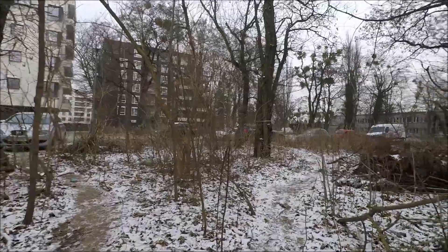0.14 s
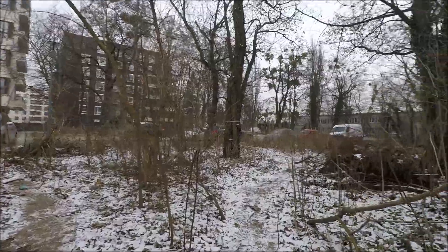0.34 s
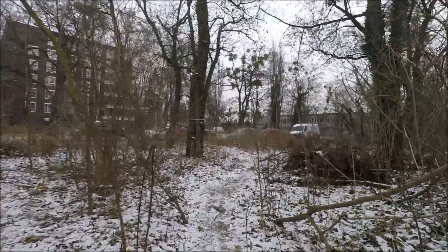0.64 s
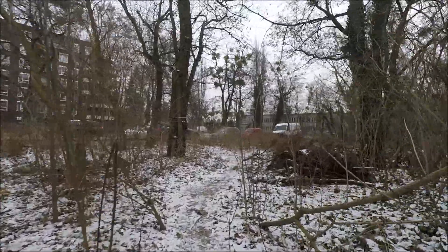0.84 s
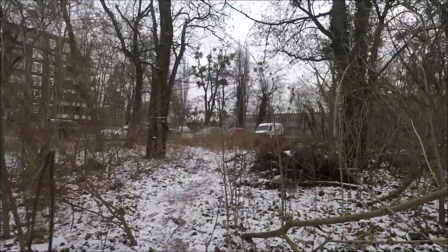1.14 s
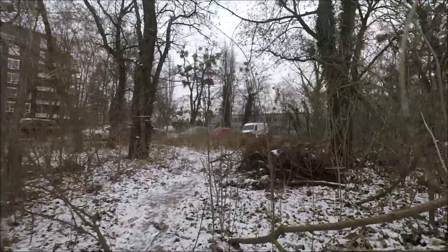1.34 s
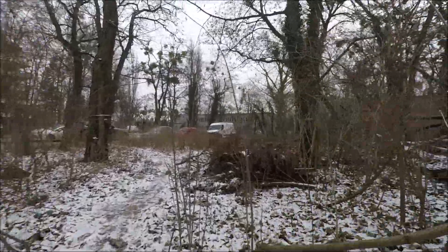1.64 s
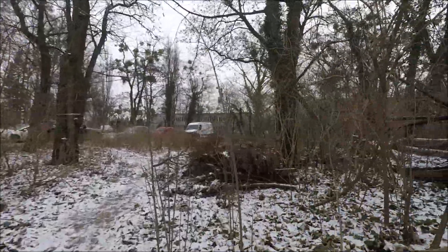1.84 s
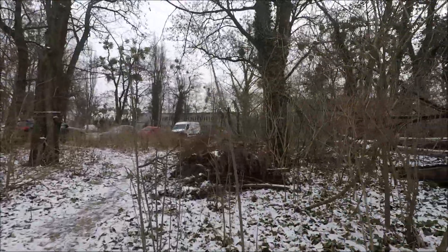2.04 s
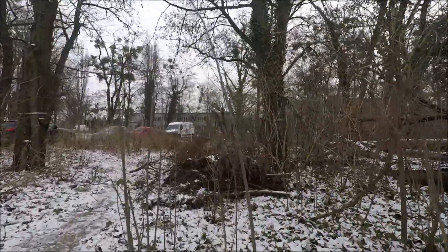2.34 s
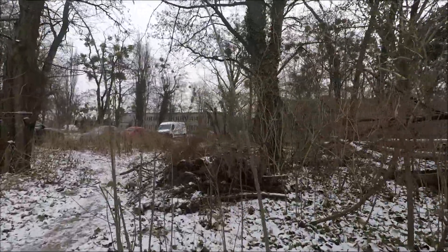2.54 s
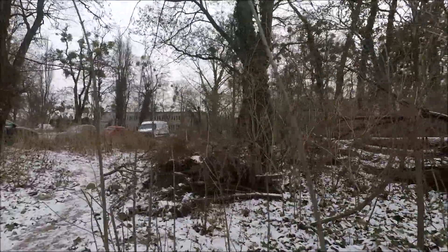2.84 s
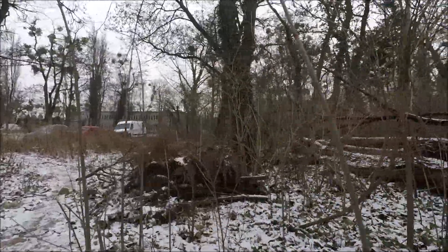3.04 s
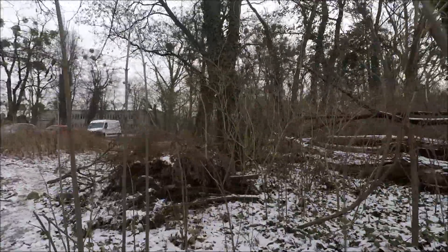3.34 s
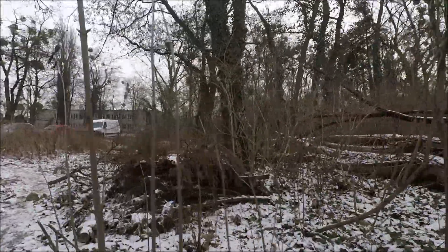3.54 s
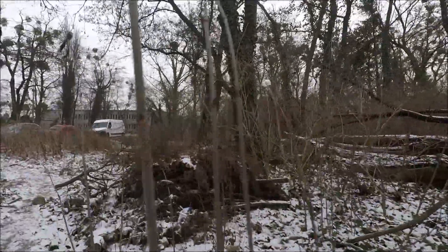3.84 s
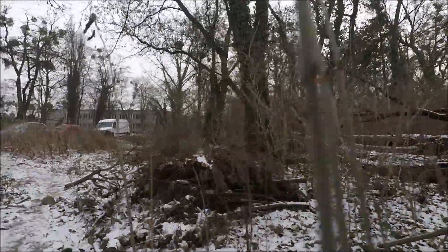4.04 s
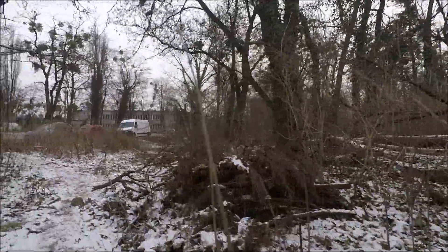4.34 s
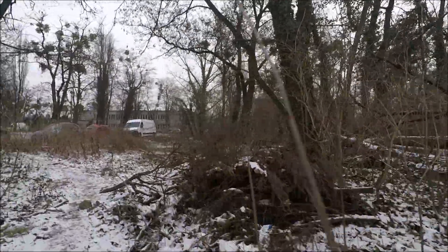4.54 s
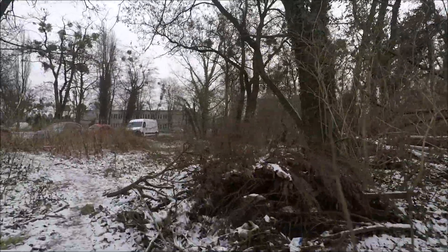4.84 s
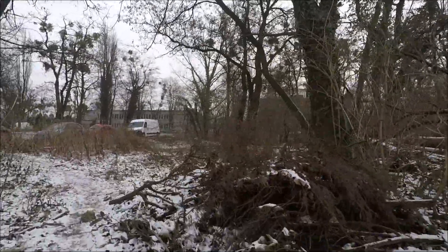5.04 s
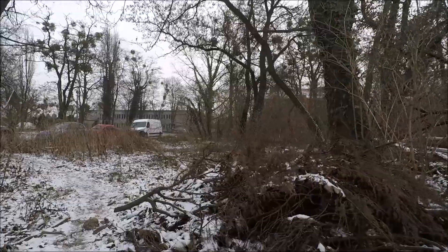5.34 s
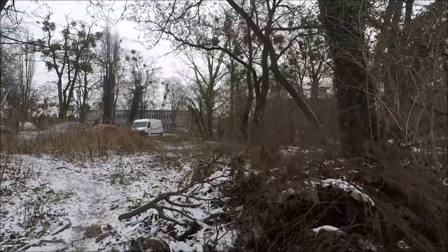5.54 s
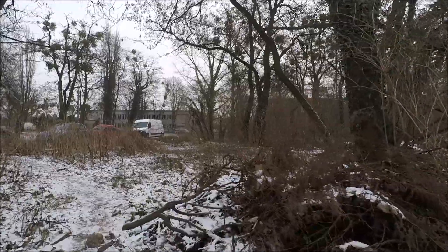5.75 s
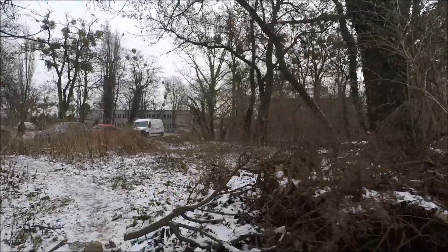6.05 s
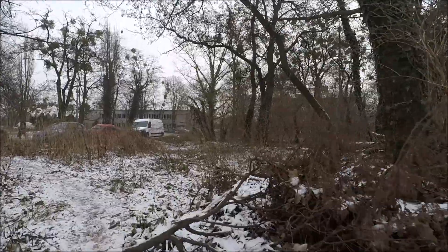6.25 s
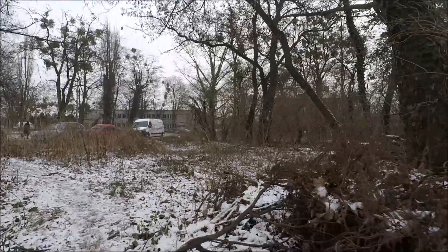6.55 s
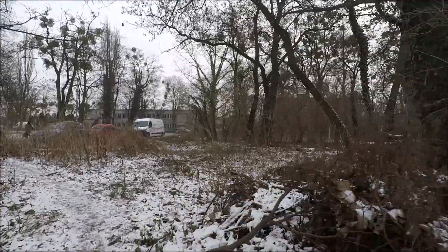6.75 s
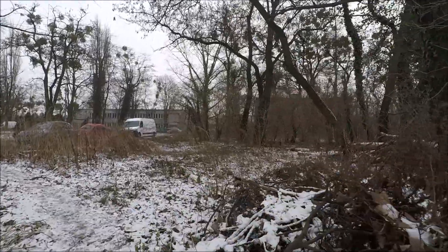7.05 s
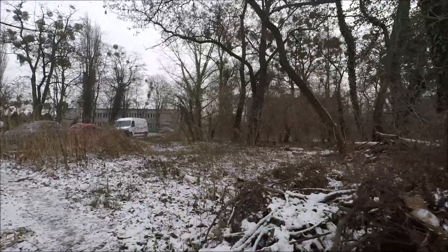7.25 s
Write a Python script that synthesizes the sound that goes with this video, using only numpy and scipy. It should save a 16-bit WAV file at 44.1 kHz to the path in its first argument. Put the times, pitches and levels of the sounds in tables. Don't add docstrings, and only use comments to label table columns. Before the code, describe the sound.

Someone walks through snowy undergrowth, crisp crunches, dragging scuffs and sharp twig cracks close by, with far traffic rumbling deep underneath.

```python
import sys
import numpy as np
from scipy import signal
from scipy.fft import rfft, irfft, next_fast_len
from scipy.io import wavfile
from scipy.ndimage import uniform_filter1d, map_coordinates

SR = 44100
rng = np.random.default_rng(int(sys.argv[2]) if len(sys.argv) > 2 else 0)


def transcribe(u):
    v = np.clip(np.atleast_2d(u).T, -1, 1)
    q = np.round(v * 32767).astype(np.int16)
    wavfile.write(sys.argv[1], SR, q)


def volts(x):
    e = np.asarray(x, float) / 20
    return 10 ** e


N = 326340


def unit(x):
    return x / np.sqrt(np.mean(x ** 2) + 1e-20)


def curves(rows, outside=None):
    s, *columns = np.transpose(rows)
    return [np.interp(np.arange(N) / SR, s, column, outside, outside) for column in columns]


def wobble(rate_hz):
    knots = rng.standard_normal(int(N * rate_hz / SR) + 4)
    return map_coordinates(knots, [np.arange(N) * rate_hz / SR])


def coloured(x, points, lo_hz=0, hi_hz=SR):
    m = next_fast_len(N + 8192)
    hz = np.fft.rfftfreq(m, 1 / SR)
    f, db = np.transpose(points)
    gain = volts(np.interp(np.log(hz + 1), np.log(f + 1), db, -120, -120))
    band = 1 / np.sqrt((1 + (lo_hz / (hz + 1e-3)) ** 8) * (1 + (hz / hi_hz) ** 8))
    return irfft(rfft(x, m) * gain * band, m)[:N]


# (frequency [Hz], level per Hz [dB])
CITY_COLOUR = [(280, -26), (480, 2.5), (563, -8.5), (740, 2.5), (945, -1.5), (1090, -11.5), (1190, -4.5),
               (1520, 0.5), (1840, -6), (3360, -11.5), (6820, -7), (10700, -11), (11600, -18.5),
               (13400, -18.5), (15100, -27)]
# (frequency [Hz], level [dB])
WHINE = [(11000, -86), (11050, -87), (12950, -97), (13000, -95)]


def city():
    t = np.arange(N) / SR
    level_db = -63.38 + 0.4 * wobble(3)
    out = volts(level_db) * unit(coloured(rng.standard_normal(N), CITY_COLOUR))
    for hz, db in WHINE:
        flutter_db = 1.5 + 1.8 * wobble(3.4) + 4 * wobble(45)
        out += volts(db + flutter_db) * np.sin(2 * np.pi * hz * t)
    return out


# (time [s], strength [dB])
TRAFFIC = [(0.0, -42), (0.45, -44.5), (1.0, -44), (1.9, -45.5), (2.7, -43), (3.05, -48), (3.3, -40.5),
           (3.75, -46), (4.15, -39.5), (4.5, -44.5), (5.1, -40), (5.9, -42.5), (6.3, -46.5), (6.9, -43.5),
           (7.2, -44.5), (7.4, -39.5)]
# (frequency [Hz], level per Hz [dB])
RUMBLE_COLOUR = [(8.8, -39), (15, -4), (75, 0), (103, -3), (129, -6.5), (279, -15), (340, -20),
                 (401, -18.5), (560, -53), (730, -48), (1230, -120)]
# (time [s], pitch [Hz], level [dB])
IDLE = [
    (0.5, 39.71, -46.5),
    (0.75, 39.96, -35.5),
    (1.37, 41.2, -35.5),
    (1.78, 41.09, -39),
    (1.87, 43.1, -45),
    (1.99, 43.09, -37.5),
    (2.62, 44.08, -45),
    (2.75, 44.06, -38.5),
    (3.03, 43.57, -41),
]
# (time [s], pitch [Hz], level [dB])
SLOWING = [
    (4.85, 124.8, -49.5),
    (4.97, 123.7, -45),
    (5.1, 122.3, -59),
    (5.3, 119.2, -51),
    (5.7, 113.3, -47.5),
    (6.0, 111.4, -55),
    (6.26, 106.4, -49.5),
    (6.45, 103.7, -54),
]


def traffic():
    strength_db, = curves(TRAFFIC)

    def rumble(lo_hz, hi_hz):
        return unit(coloured(rng.standard_normal(N), RUMBLE_COLOUR, lo_hz, hi_hz))

    recede_db = -0.5 * np.arange(N) / SR
    out = volts(strength_db + 3.5 + recede_db) * rumble(0, 57.7)
    out += volts(strength_db - 3) * rumble(55.3, 136)
    out += volts(-52.5) * rumble(128, SR)
    for note in (IDLE, SLOWING):
        hz = curves(note)[0]
        level = uniform_filter1d(volts(curves(note, outside=-120)[1]), SR // 12)
        out += np.sqrt(2) * level * np.sin(2 * np.pi * np.cumsum(hz) / SR)
    return out


# (time [s], peak level [dB], pitch [Hz])
THUDS = [
    (1.078, -32, 54.3),
    (3.17, -32, 72),
    (3.593, -27, 54),
    (3.992, -30.5, 78),
    (4.114, -26, 70.6),
    (4.219, -25, 62.5),
    (4.994, -28.5, 57),
    (6.034, -37.5, 76),
    (6.201, -40, 68.4),
    (6.865, -37.5, 92),
]


def thuds():
    out = np.zeros(N + SR)
    t = np.arange(-SR // 20, SR // 10) / SR
    swell = np.exp(-(t / np.where(t < 0, 0.012, 0.02)) ** 2)
    for s, db, hz in THUDS:
        push = volts(db) * swell * np.cos(2 * np.pi * hz * t)
        out[round(s * SR) - SR // 20:][:len(t)] += push
    return out[:N]


# (time [s], peak level [dB], ring [Hz],
# low part against the peak [dB])
SNAPS = [(0.793, -45.5, 3200, -11), (1.4855, -37.5, 4100, -13.5), (1.585, -45, 4500, -7),
         (1.724, -54, 2550, -4), (1.994, -51, 6900, -10), (2.11, -49, 8100, -13), (2.7634, -42, 7100, -18),
         (2.854, -49, 4000, -7), (3.3615, -46, 4000, -18), (3.4674, -51, 5300, -3),
         (3.9465, -45, 6100, -19), (4.1271, -41, 7700, -22), (4.135, -41, 6600, -22),
         (4.198, -49, 7100, -15), (4.2215, -22.5, 6100, -22.5), (4.2646, -51, 6300, -15),
         (4.2738, -34.5, 6660, -25), (4.279, -45, 3880, -14), (4.8237, -44, 6100, -11),
         (4.914, -40.5, 7100, -12), (5.157, -43, 6360, -13), (5.2889, -42, 6500, -23),
         (5.389, -43.5, 3830, -11), (5.4622, -44, 6400, -21), (5.5552, -42.5, 3900, -20),
         (5.5724, -41.5, 6940, -10), (5.6379, -43, 6800, -25), (5.7042, -36.5, 6240, -20),
         (5.8567, -55, 4990, -20), (7.085, -46, 6800, -13),
         (6.7575, -53, 5940, -14),
    (6.7872, -27, 5240, -36),
    (6.7944, -27, 6600, -38),
    (6.7968, -30, 6660, -27),
    (6.8056, -40, 4040, -24),
    (6.8157, -38, 6900, -23),
    (6.825, -37, 6500, -30),
]
# (frequency [Hz], level [dB])
TWIG_COLOUR = [(2500, -13), (3300, -27), (3750, 5.5), (4700, -4), (6000, 0), (7500, -1.5), (9500, -17),
               (12000, -12), (15500, -36)]
BRANCH_COLOUR = [(500, -13), (750, -3), (1080, -11), (1500, -0.5), (2000, -13), (3300, -11), (3800, -24)]


def snaps():
    splinter_t60_s, ring_t60_s, knock_t60_s = 0.037, 0.0028, 0.27
    lead = SR // 100
    t = np.arange(-lead, SR // 8) / SR
    after = np.maximum(t, 0)
    lead_in = 0.5 * np.exp(np.minimum(t, 0) / 0.001)
    shape = np.where(t < 0, lead_in, volts(-60 * after / splinter_t60_s))
    ring_shape = volts(-60 * after / ring_t60_s) * (1 - np.exp(-after / 0.00007))
    rings, splinters, knocks = np.zeros((3, N + SR))
    for s, db, hz, low_db in SNAPS:
        luck = rng.standard_normal((2, len(t)))
        bits = shape * luck[0] * volts(3.6 * np.clip(luck[1], -2, 2))
        splinter_db = -59 + 0.91 * (db + 42.5)
        knock = bits * volts(-60 * after / knock_t60_s) + 4 * (t == 0)
        start = round(s * SR) - lead - 2
        rings[start:][:len(t)] += volts(db + 1) * np.sin(2 * np.pi * hz * after) * ring_shape
        splinters[start:][:len(t)] += volts(splinter_db) * bits
        knocks[start:][:len(t)] += volts(db + low_db) * knock
    out = rings[:N] + volts(4.5) * coloured(splinters[:N], TWIG_COLOUR)
    return out + volts(13.5) * coloured(knocks[:N], BRANCH_COLOUR)


def grains(spread_db, clump_db):
    rank = np.minimum(rng.exponential(size=N), 4)
    return unit(volts(spread_db * rank + clump_db * wobble(90)) * rng.standard_normal(N))


def patchy(x, depth_db):
    z = signal.stft(x, nperseg=256)[2]
    field = uniform_filter1d(rng.standard_normal(z.shape), size=4, axis=0)
    field = uniform_filter1d(field, size=7, axis=1)
    return unit(signal.istft(z * volts(depth_db * unit(field)), nperseg=256)[1][:N])


# (start [s], press [s], crunch [dB],
# then against the crunch: coarse crust [dB], frozen leaves [dB])
STEPS = [(0.14, 0.068, -61, -5.5, -6.5), (0.795, .135, -65, -4.5, -5), (1.484, 0.11, -62.5, -3.5, -2),
         (1.99, 0.071, -65, -2.5, -2.5), (2.11, 0.056, -61, -9.5, -8.5), (2.21, 0.04, -63, -11, -9),
         (2.762, 0.052, -63.5, -6, -2), (2.85, 0.034, -62.5, -5, -2.5), (3.467, .13, -58, -5.5, -3.5),
         (3.945, 0.17, -65, -5, -7.5), (4.125, 0.011, -58, -10, -10), (4.19, 0.031, -61, -8, -10),
         (4.27, 0.0071, -56.5, -19, -5), (4.825, 0.057, -53.5, -4.5, -3.5), (4.913, 0.0099, -53, -7, -5),
         (5.48, 0.092, -58.5, -7.5, -9.5), (5.624, 0.015, -65, -12, -8), (6.762, .02, -65, -10, 5),
         (6.783, .02, -54.5, -14, -3), (6.815, 0.019, -55, -10, -6)]
# (start [s], length [s], crunch [dB], powder against it [dB])
DRAGS = [(0.0, 0.2, -73, -5), (0.24, 0.15, -80, -10), (0.46, 0.18, -69, -6), (0.6, 0.15, -66, -4),
         (1.028, .31, -67.5, -4), (1.764, 0.16, -69, -6), (2.41, 0.39, -71.5, 1.5), (2.786, 0.21, -70.5, 1),
         (3.11, 0.11, -70, -2), (3.256, 0.48, -71, -10), (3.5, 0.1, -63, -4.5), (3.574, 0.15, -60.5, -5.5),
         (3.818, 0.23, -68, -5), (4.38, 0.26, -70.5, -9), (4.657, 0.15, -63.5, -10),
         (4.734, 0.18, -61.5, -3), (4.92, 0.35, -62, -6.5), (5.174, 0.36, -62, -13), (5.803, 0.16, -69, -4),
         (5.957, 0.23, -64, -4.5), (6.102, .22, -66.5, -4), (6.32, .42, -73, -2), (6.82, 0.28, -68.5, -5),
         (7.135, 0.13, -65, -4.5), (7.287, .16, -70, -4)]


def pressure():
    land_s, settle_s, lift_db_per_s = 0.017, 0.051, 391
    t = np.arange(N) / SR
    power = np.zeros((4, N))
    for s, press, db, crust_db, leaves_db in STEPS:
        lift_db = -lift_db_per_s * np.maximum(t - s - press, 0)
        shape = np.clip((t - s) / land_s + 1, 0, 1) * volts(lift_db)
        early_db = -2.5 * np.clip(1 - (t - s) / settle_s, 0, 1)
        powder_db = -5 + 2 * early_db + 0.3 * lift_db
        balance_db = np.array([early_db, 0 * t + crust_db, 0 * t + leaves_db, powder_db])
        power += (volts(db + balance_db) * shape) ** 2
    for s, length, db, powder_db in DRAGS:
        edge_s = 0.29 * length
        shape = np.clip(np.minimum(t - s, s + length - t) / edge_s, 0, 1)
        balance_db = np.array([[0], [-10], [-8.5], [powder_db]])
        power += (volts(db + balance_db) * shape) ** 2
    return np.sqrt(power)


# (frequency [Hz], level [dB])
SNOW_COLOUR = [(4900, -20), (5800, -6.5), (6700, -4), (7900, -10), (9000, -19)]
CRUST_COLOUR = [(550, -40), (750, 10), (1080, -0.5), (1500, 5.5), (2500, 5.5), (3400, 3.5), (3800, 2.5)]
LEAVES_COLOUR = [(3300, -39), (3750, -7.5), (4500, -3.5), (5300, -5.5), (6200, -36)]
POWDER_COLOUR = [(7400, -49), (8500, 1), (9600, 3.5), (10800, -5), (11500, -7), (15000, -14), (16000, -35)]


def tread():
    breaks = patchy(grains(spread_db=4.3, clump_db=1.1), depth_db=1.8)
    colours = (SNOW_COLOUR, CRUST_COLOUR, LEAVES_COLOUR, POWDER_COLOUR)
    return sum(level * unit(coloured(breaks, colour)) for colour, level in zip(colours, pressure()))


def scene():
    return (city() + traffic() + thuds() + snaps() + tread())[None]


def band_limit(x):
    return signal.sosfilt(signal.butter(12, 15220, fs=SR, output="sos"), x)


def record(dry):
    ease = np.minimum(1, np.arange(N, 0, -1) / (SR / 200))
    return band_limit(dry * ease)


dry = scene()
out = record(dry)
transcribe(out)
```